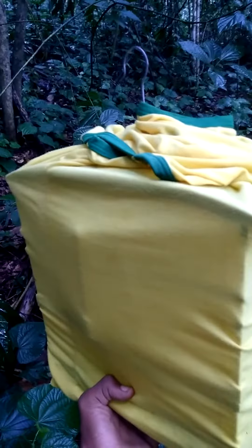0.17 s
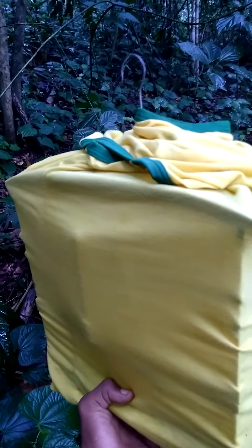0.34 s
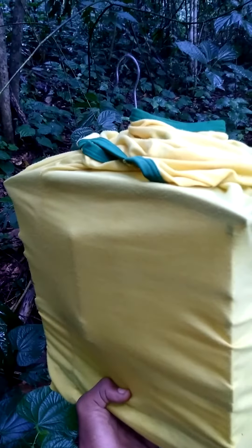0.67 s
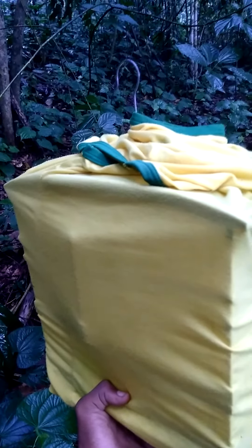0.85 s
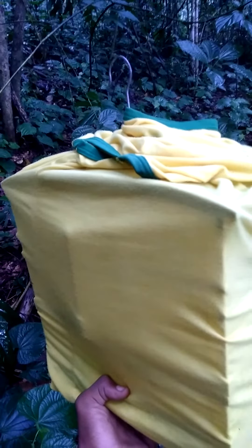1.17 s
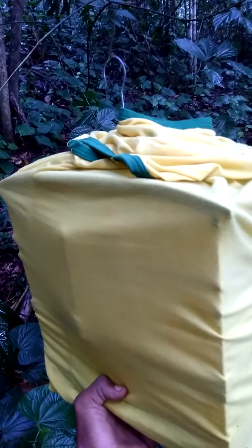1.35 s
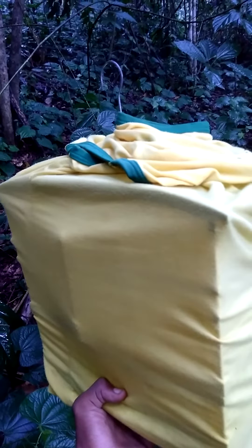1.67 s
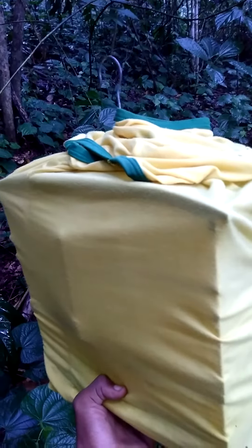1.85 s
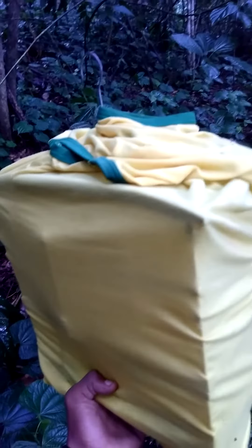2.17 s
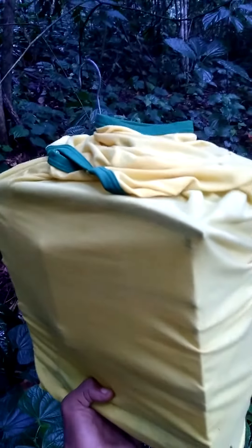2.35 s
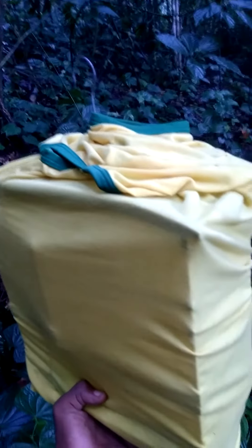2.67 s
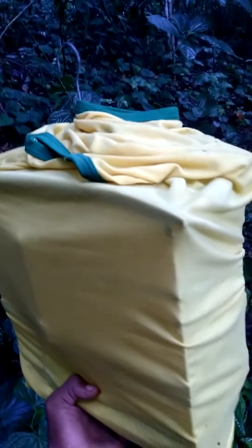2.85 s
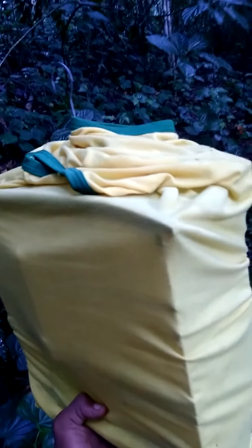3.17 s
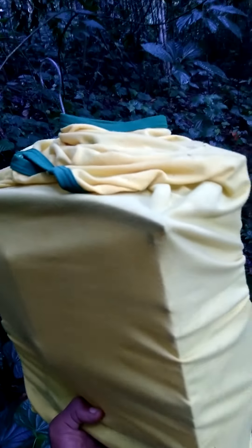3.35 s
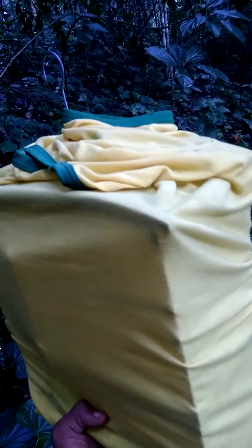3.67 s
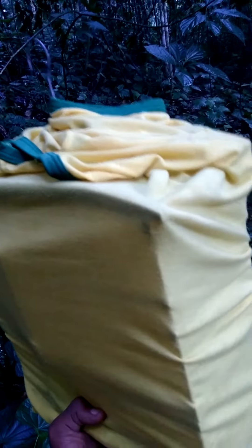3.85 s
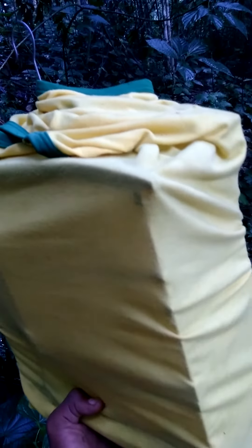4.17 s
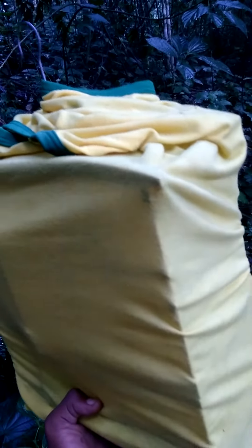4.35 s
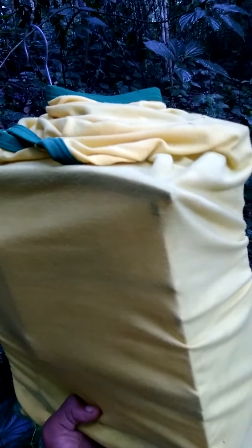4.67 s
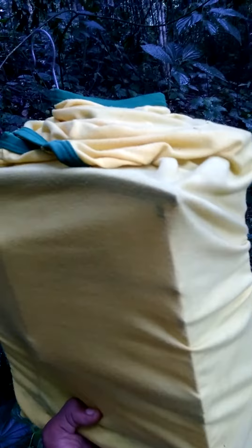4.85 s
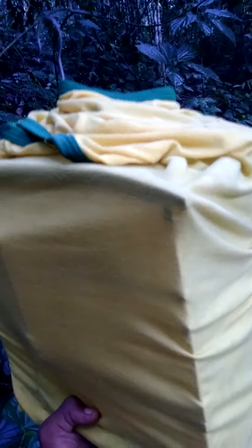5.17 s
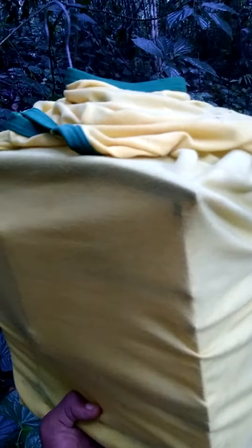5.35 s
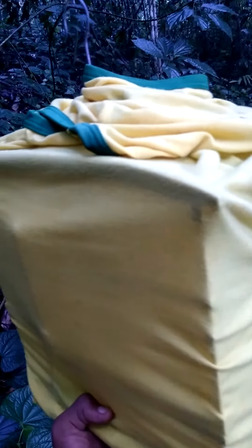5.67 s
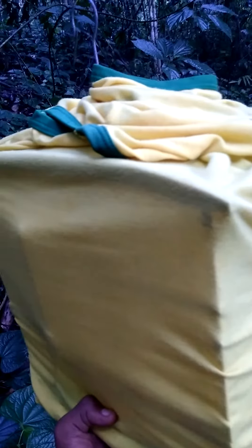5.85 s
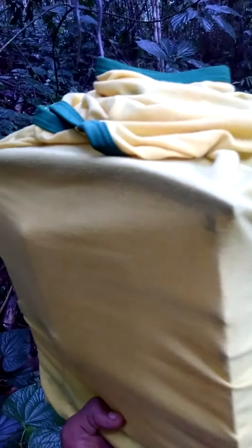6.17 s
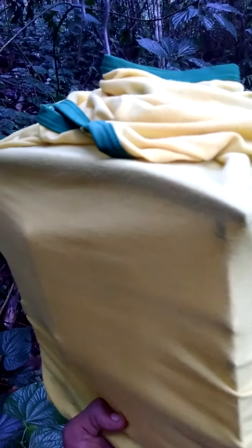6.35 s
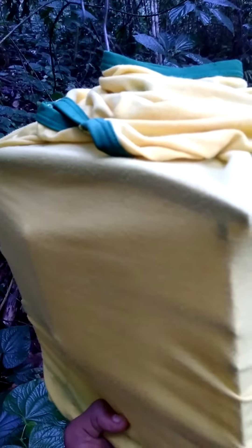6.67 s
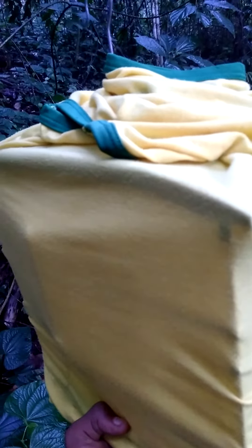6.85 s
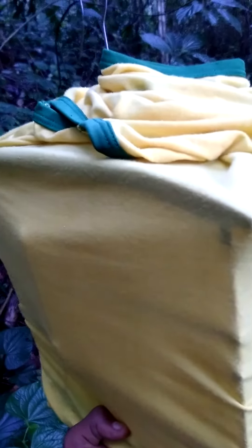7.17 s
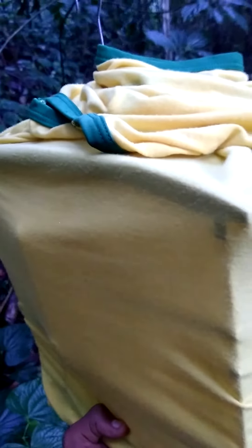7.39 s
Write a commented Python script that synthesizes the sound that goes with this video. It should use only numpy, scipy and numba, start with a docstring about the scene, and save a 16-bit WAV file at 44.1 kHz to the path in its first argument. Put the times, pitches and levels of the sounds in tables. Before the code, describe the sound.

In woodland, a small bird in a cloth-covered cage sings close to a phone: a faint high chip, then four brief, piercing falling whistles spaced well apart. Between them, cage, cloth and twigs tick, knock and rustle irregularly. Distant birds answer in echoing slurs over a low, leafy hush. The phone dips the background briefly after each loud note.

```python
"""In a wood, a small bird in a cloth-covered cage held near a phone sings sharp falling notes.
Both halves of its voice box whistle at once; pitch and level follow drawn curves.
Other birds, gliding sines steeped in echo, call from between the trunks.
Cage, cloth and twigs tick in dying noise bursts over a forest hush of shaped noise.
The phone widens its two ports by a delayed cross-feed and ducks its gain after each loud note."""
import sys
import numpy as np
from scipy import signal
from scipy.fft import rfft, irfft, next_fast_len
from scipy.io import wavfile
from scipy.ndimage import uniform_filter1d
from numba import njit

SR = 44100
rng = np.random.default_rng(int(sys.argv[2]) if len(sys.argv) > 2 else 0)


def put_to_file(sound):
    """Save the sound as 16-bit audio at rate SR, in the file named by the first command-line argument."""
    columns = np.atleast_2d(sound).T  # one column per channel
    safe = np.clip(columns, -1, 1)
    whole_steps = np.round(safe * 32767)
    wavfile.write(sys.argv[1], SR, whole_steps.astype(np.int16))


N = 331632

# how busily hand, cloth and leaves move: (time [s], level [dB])
BUSY = [(0, 2), (.6, -4.5), (1.3, 0.5), (2.1, -2), (3, -1.5), (3.7, -3), (4.8, 0), (5.5, 0), (6.2, 2),
        (6.8, -1.5), (7.1, -2.5), (7.52, -2)]


def undb(db):
    """Decibels to gain."""
    return 10 ** (np.asarray(db) / 20)


def dying_60db(t, t60_s):
    """Exponential decay by 60 dB in t60_s."""
    return np.exp(-np.log(1000) * t / t60_s)


def band(x, hz, width_hz):
    """Band-pass around hz."""
    edges = [max(hz - width_hz / 2, 20), min(hz + width_hz / 2, .45 * SR)]
    return signal.sosfilt(signal.butter(2, edges, "bandpass", fs=SR, output="sos"), x)


def walk(rate_hz, channels=1):
    """Random levels held 1 / rate_hz and smoothed twice over that time; spread near 1."""
    k = int(SR / rate_hz)
    held = np.repeat(rng.standard_normal((channels, N // k + 1)), k, axis=1)[:, :N]
    return np.sqrt(2) * uniform_filter1d(uniform_filter1d(held, k), k)


def wood(x, t60_s, build_s=0.0058, late_db=-16, stir_rad=0):
    """Trunk and leaf echoes: noise tails that build up and die; moving air blends two stereo sets."""
    t = np.arange(SR) / SR
    dying = dying_60db(t, t60_s) + undb(late_db) * dying_60db(t, 3 * t60_s)  # furthest echoes last longest
    tail = rng.standard_normal((4, SR)) * dying * (1 - np.exp(-t / build_s))
    tail = tail / np.sqrt(np.sum(tail ** 2) / 4)
    wet = signal.fftconvolve(x[None], tail, axes=1)[:, :N]
    angle = stir_rad * walk(40)
    return np.cos(angle) * wet[:2] + np.sin(angle) * wet[2:]


def hush(swell_db=.7, flicker_db=1.4, throb_hz=1400, throb_gain_db=-67, throb_depth_db=3.0):
    """Leaves, air and far insects: shaped noise, mostly unrelated at the ports; a narrow band throbs."""
    # at each port, before the BUSY level: (frequency [Hz], density [dB per Hz])
    hush_density = [(25, -103), (60, -81.5), (110, -71), (250, -78), (600, -86), (1400, -86.5),
                    (2200, -91.5), (3300, -91.5), (5000, -103), (9000, -101), (12000, -105), (15500, -108)]
    # part common to both ports: (frequency [Hz], share [0-1])
    hush_shared = [(120, 0.2), (300, 0.45), (900, 0.3), (2500, 0)]
    log_f = np.log(np.arange(N // 2 + 1) * SR / N + 1)
    hz, density_db = np.transpose(hush_density)
    shape_db = np.interp(log_f, np.log(hz), density_db)
    hz, shared = np.transpose(hush_shared)
    share = np.clip(np.interp(log_f, np.log(hz), shared), 0, 1)

    white = rfft(rng.standard_normal((3, N)))
    mixed = np.sqrt(1 - share) * white[:2] + np.sqrt(share) * white[2]
    noise = irfft(mixed * undb(shape_db), N) * np.sqrt(SR / 2)
    busy_db = np.interp(np.arange(N) / SR, *np.transpose(BUSY))
    moving = noise * undb(busy_db + swell_db * walk(3.115) + flicker_db * walk(12))
    throb = band(rng.standard_normal((2, N)), throb_hz, 130) * np.sqrt(SR / 500)
    return moving + throb * undb(throb_gain_db + throb_depth_db * walk(23))


def slurs(rows, bend_hz, flutter_db, db_per_khz=0, edge=.45):
    """Whistles gliding straight in pitch: (time [s], length [s], from [Hz], to [Hz], level [dB])."""
    dry = np.zeros(N)
    for s, length_s, hz0, hz1, db in rows:
        i = np.arange(int(max(s, 0) * SR), min(int((s + length_s) * SR), N))
        hz = np.linspace(hz0, hz1, len(i)) + bend_hz[i]
        tilt_db = db_per_khz * (hz - (hz0 + hz1) / 2) / 1000
        size = undb(db + flutter_db[i] + tilt_db) * signal.windows.tukey(len(i), edge)
        dry[i] += size * np.sqrt(2) * np.sin(2 * np.pi * np.cumsum(hz) / SR)
    return dry


def far_birds(waver_hz=90, seep_waver_hz=480, whistle_waver_hz=55, flutter_db=3.0):
    """Warbler and thin calls arrive mostly as echo, 10 dB over the direct sound; so do nearer whistlers."""
    # distant warbler, quick falling slurs: (time [s], from [Hz], level [dB])
    falls = [(0.901, 3660, -44.5), (0.96, 4004, -40), (1.116, 3824, -39), (3.397, 3490, -47.5),
             (3.643, 3496, -52), (4.431, 3550, -41), (4.489, 3710, -46), (4.599, 4126, -39.5),
             (5.607, 3530, -40), (5.81, 3890, -40), (5.984, 4380, -39), (7.257, 3580, -41.5),
             (7.455, 3880, -38)]
    # its rising slurs: (time [s], from [Hz], level [dB])
    rises = [(0.941, 2912, -42), (1.061, 3014, -42), (3.548, 2650, -40.5), (4.468, 2914, -46.5),
             (4.551, 3345, -49), (5.752, 2840, -40.5), (5.79, 3140, -44.5), (5.93, 3350, -44.5)]
    # thin high calls of another small bird: (time [s], from [Hz], level [dB])
    seeps = [(0.48, 10270, -58.5), (.68, 9770, -58), (0.863, 8450, -56.5), (1.041, 9670, -60),
             (1.448, 10400, -59.5), (1.555, 9400, -60), (2.556, 9180, -58), (4.49, 9370, -62.5)]
    # steadier whistles of other birds: (time [s], length [s], from [Hz], to [Hz], level [dB])
    whistles = [(0, 0.019, 2472, 2217, -29), (1.41, .09, 1600, 1520, -57), (1.56, 0.12, 2120, 1700, -58),
                (1.79, .1, 2120, 1700, -57), (2.345, 0.015, 3400, 3100, -58),
                (2.45, 0.038, 3350, 3050, -56), (2.53, 0.036, 3300, 3050, -61),
                (5.666, 0.1, 2910, 2640, -44.5), (6.085, 0.035, 5600, 8140, -46.5),
                (6.102, 0.02, 8650, 8000, -37.5), (6.14, .09, 2370, 1900, -51),
                (6.28, 0.1, 2060, 2180, -52), (6.51, 0.07, 3340, 3650, -55), (6.57, 0.05, 3620, 3720, -47),
                (6.62, 0.087, 3684, 3720, -53), (6.7, 0.078, 3760, 3640, -54.5),
                (6.77, 0.18, 3600, 3500, -60), (6.594, 0.074, 2450, 1950, -48),
                (6.72, 0.15, 2140, 2218, -49), (7.15, 0.15, 2560, 2200, -52), (7.415, .05, 3880, 3760, -44),
                (7.441, 0.045, 6400, 5360, -48)]
    fall_s, fall_to_hz = 0.055, 2800
    rise_s, rise_ratio = 0.069, 1.36
    seep_s, seep_to_hz = .1, 8100
    warbler_db_per_khz = -15  # the low part of each slur carries best
    far_t60_s, far_direct_db = .44, -10
    whistle_t60_s, whistle_direct_db = .36, -10

    bend, flutter = walk(300)[0], flutter_db * walk(60)[0]
    warbler_rows = [(s, fall_s, hz, fall_to_hz, db) for s, hz, db in falls]
    warbler_rows += [(s, rise_s, hz, rise_ratio * hz, db) for s, hz, db in rises]
    seep_rows = [(s, seep_s, hz, seep_to_hz, db) for s, hz, db in seeps]
    far = slurs(warbler_rows, waver_hz * bend, flutter / 2, warbler_db_per_khz)
    far = far + slurs(seep_rows, seep_waver_hz * bend, flutter)
    nearer = slurs(whistles, whistle_waver_hz * bend, flutter)

    far_echo = wood(far, far_t60_s, build_s=0.012, late_db=-19, stir_rad=1.2)
    nearer_echo = wood(nearer, whistle_t60_s, build_s=0.0023, late_db=-20, stir_rad=1.2)
    return far_echo + undb(far_direct_db) * far + nearer_echo + undb(whistle_direct_db) * nearer


def tick_shapes(count):
    """Short dying noise bursts, one for each tick, port and range, scaled to 0 dB over 2 ms."""
    # thump, knock, snap, fizz: (centre [Hz], width [Hz], t60 [s])
    tick_ranges = [(450, 460, 0.043), (1320, 900, 0.071), (2560, 2100, 0.075), (9500, 26000, 0.0037)]
    t = np.arange(2200) / SR
    noise = rng.standard_normal((count, 2, len(t)))
    noise[:, 0, 0] += 11  # the first touch is a sharp click
    noise[:, 1] = 0.22 * np.roll(noise[:, 0], shift=6, axis=-1) + 0.5 * noise[:, 1]
    shapes = np.array([band(noise * dying_60db(t, t60_s), hz, width_hz)
                       for hz, width_hz, t60_s in tick_ranges])
    return shapes * np.sqrt(.002 * SR / np.sum(shapes ** 2, axis=-1, keepdims=True))


def handling(rustle_db=(-55, -58, -68, -74), colour_db=4.0, count=750):
    """Clear ticks of cage, cloth and twigs, and a scatter of small ones from cloth and leaf litter."""
    # (time [s], level over 2 ms [dB], brightness [0 thump, 1 knock, 2 snap, 3 fizz])
    ticks = [(0.0358, -30, 0.75), (0.258, -32.5, 0.17), (0.295, -37.5, .1), (0.315, -35.5, .8),
             (0.553, -41.5, .8), (0.723, -45, .6), (0.812, -59, 1), (0.8762, -33.5, 0.035), (.95, -41, .5),
             (.966, -37.5, .3), (1.082, -41, 2.8), (1.04, -37.5, .4), (1.141, -37, 2), (1.142, -34, -0.5),
             (1.175, -34, 2.9), (1.298, -59, .8), (1.339, -52, .1), (1.37, -31.5, 1.65),
             (1.366, -26.5, 0.34), (1.477, -45, 3.1), (1.5992, -30.5, 1.3), (1.7694, -29, 0.59),
             (1.8217, -35.5, 3.5), (2.2722, -39, 0.85), (2.4349, -33, 0.63), (2.6278, -30, 0.4),
             (2.754, -40, 1.95), (3.019, -41, 3.3), (3.1091, -32, 0.5), (3.412, -34, 0.83),
             (3.969, -38, 0.88), (4.0483, -45, 3.1), (4.085, -38.5, 0.88), (4.3593, -29, 0.16),
             (4.587, -38, .9), (4.711, -38, 1), (4.799, -39, 2.9), (4.861, -36.5, 0.6), (4.881, -30, 1.2),
             (4.888, -26, .8), (4.941, -39, 0.78), (5.019, -45.5, 1), (5.2807, -32, 2.4),
             (5.3886, -34.5, 3), (5.715, -37.5, 3.1), (5.7733, -29.5, 0), (5.967, -30.5, 1.5),
             (6.2268, -33, 1.2), (6.345, -32, 0.75), (6.469, -34, 0.3), (6.509, -38, 0.8), (6.554, -36, 0),
             (6.605, -38, 0.2), (6.635, -31, 0.6), (6.684, -29.5, 0.5), (6.745, -40, 1), (6.795, -40, 0),
             (6.8403, -31.5, 0.8), (6.848, -33.5, 0.7), (6.858, -36, 0.6), (6.929, -37, 0.1),
             (7.082, -39, .9), (7.121, -39, 1), (7.462, -40, 2.1)]
    slope_db = 10  # lost per range away from the brightness
    at_s, peak_db, bright = np.transpose(ticks)[:, :, None]
    clear_db = peak_db - slope_db * np.abs(np.arange(4) - bright)

    chance = rng.random((count, 2))
    small_s = chance[:, :1] * N / SR
    size_db = np.minimum(-3.5 * np.log(chance[:, 1:]), 5.5)
    size_db = size_db + 1.2 * np.interp(small_s, *np.transpose(BUSY))
    small_db = np.array(rustle_db) + size_db + colour_db * rng.standard_normal((count, 4))

    rows = np.vstack([np.c_[at_s, clear_db], np.c_[small_s, small_db]])
    shapes = tick_shapes(len(rows))
    length = shapes.shape[-1]
    out = np.zeros((2, N + length))
    for k, (s, *db) in enumerate(rows):
        start = int(s * SR)
        out[:, start:start + length] += np.tensordot(undb(db), shapes[:, k], 1)
    return out[:, :N]


def caged_bird(flutter_db=1.24, waver_hz=30, breath_db=-20, octave_breath_db=3, square=0.093, cube=0.3):
    """Two whistling membranes, each with a weak, breathy octave; one windpipe adds combination tones."""
    # a chip, then low and high voice of four notes; a curve each: (time [s], pitch [Hz], level [dB])
    song = [
        [(1.156, 8040, -35.5), (1.1622, 9400, -24), (1.17, 8840, -43), (1.1745, 7120, -32.5),
         (1.183, 6350, -43)],
        [(1.89, 10800, -37), (1.895, 9940, -22.0), (1.905, 8820, -27.5), (1.922, 8660, -18.5),
         (1.934, 8620, -12.5), (1.953, 7800, -14.5), (1.964, 7630, -17.5), (1.97, 7900, -32),
         (1.972, 8510, -27.5), (1.976, 8370, -32.5)],
        [(1.89, 12040, -30), (1.901, 11070, -27.5), (1.905, 10450, -31), (1.921, 10650, -35),
         (1.925, 10150, -20), (1.932, 9800, -13), (1.94, 9700, -14.5), (1.967, 8790, -17.5), (1.977, 8700, -35)],
        [(3.424, 10460, -35), (3.426, 10100, -33), (3.43, 9610, -24.5), (3.443, 9040, -17.5),
         (3.453, 8840, -14.5), (3.458, 8630, -14.5), (3.472, 8230, -12.5), (3.495, 7670, -12.5),
         (3.504, 7770, -21.5), (3.511, 8360, -24.5)],
        [(3.424, 12200, -34), (3.429, 11340, -21.5), (3.437, 11020, -21.5), (3.445, 10500, -29.5),
         (3.452, 10560, -33.5), (3.465, 9820, -21), (3.473, 9480, -20.5), (3.496, 9300, -13),
         (3.506, 9240, -13.5), (3.512, 8900, -47)],
        [(5.074, 9770, -37), (5.077, 10250, -27), (5.082, 9350, -41.5), (5.085, 8920, -31), (5.088, 8570, -15),
         (5.123, 8030, -17), (5.129, 7800, -14), (5.147, 7330, -23.5), (5.154, 8190, -34)],
        [(5.079, 11530, -39), (5.085, 11470, -19.5), (5.096, 9850, -29), (5.104, 10080, -19.5),
         (5.107, 9810, -21.5), (5.119, 9700, -26.0), (5.126, 9460, -21), (5.131, 9430, -19), (5.146, 9080, -12),
         (5.157, 9000, -24.5)],
        [(6.958, 11200, -41), (6.962, 10900, -29), (6.967, 9940, -17.5), (6.974, 9170, -27), (6.979, 9150, -21),
         (6.993, 8660, -14), (7.009, 8280, -12), (7.015, 8040, -14), (7.022, 7270, -28), (7.033, 7380, -28),
         (7.042, 6870, -33)],
        [(6.96, 13000, -35), (6.963, 12240, -26), (6.976, 11780, -49.5), (6.994, 11060, -36.5),
         (7.004, 10200, -16), (7.017, 9570, -13.5), (7.027, 9140, -15), (7.034, 9680, -9), (7.046, 9400, -30)],
    ]
    # perch for chip and notes: (left minus right port [dB], left port's phase lead [microseconds])
    perch = [(2, 406.5), (5, 324.5), (-2, 396), (1, 404.3), (1, 425)]
    attack_s, release_s = .001, .004
    octave_db, octave_at_hz, octave_db_per_khz = -10.5, 7380, -14  # strongest on the lowest notes
    echo_t60_s, echo_db = 0.29, -21

    out = np.zeros((2, N), complex)
    flutter, waver = walk(400)[0], walk(500)[0]
    breath = band(band(rng.standard_normal((2, N)), 1600, 2800), 1600, 2800)
    for k, rows in enumerate(song):
        s, hz, db = np.transpose(rows)
        pan_db, lead_us = perch[(k + 1) // 2]
        i = np.arange(int((s[0] - attack_s) * SR), int((s[-1] + release_s / 2) * SR))
        t = i / SR
        pitch_hz = np.interp(t, s, hz)
        phase = 2 * np.pi * np.cumsum(pitch_hz + waver_hz * waver[i]) / SR
        note_octave_db = octave_db + octave_db_per_khz * (pitch_hz - octave_at_hz) / 1000
        octave_gain = undb(np.clip(note_octave_db, -30, -6))
        fade = np.clip(np.minimum((t - t[0]) / attack_s, (t[-1] - t) / release_s), 0, 1)
        for port, side in enumerate((1, -1)):
            air = breath[port, i]
            tone = np.exp(1j * np.interp(t - port * lead_us * 1e-6, t, phase))
            octave = octave_gain * tone ** 2 * (1 + undb(octave_breath_db) * air)
            breathy = undb(breath_db) * air * tone  # air noise clings to the tone
            size = undb(np.interp(t, s, db + side * pan_db / 2) + flutter_db * flutter[i]) * fade
            out[port, i] += size * (np.sqrt(2) * (tone + octave) + breathy)

    power = np.abs(out) ** 2
    beating = power - uniform_filter1d(power, size=88)
    out = np.real(out + square * out ** 2 + cube * out * beating)
    out = band(out, 11000, 15000)
    return out + undb(echo_db) * wood(out[0], echo_t60_s)


def scene():
    """What reaches the two ports."""
    return hush() + far_birds() + handling() + caged_bird()


def widen(ports):
    """Each channel takes off a late, dulled copy of the other port; the left is then trimmed."""
    cross_share, cross_delay_us, cross_fade_hz, left_db = .7, 397, 11000, -1.6
    size = next_fast_len(N + 64)
    f = np.arange(size // 2 + 1) * SR / size
    late = np.exp(-2j * np.pi * f * cross_delay_us * 1e-6)
    dulled = late / np.hypot(1, (f / cross_fade_hz) ** 2)
    crossed = irfft(rfft(ports[::-1], size) * dulled, size)[:, :N]
    return (ports - cross_share * crossed) * undb([[left_db], [0]])


@njit
def duck(power, above_db, speed, recover_db_s, gain_db):
    """Gain [dB]: falls while the output is over the mark, the faster the louder; else creeps back up."""
    out, level = np.empty(len(power)), 1e-9
    for i in range(len(power)):
        level += (power[i] * 10 ** (gain_db / 10) - level) / 220  # smoothed over 220 samples
        over_db = 10 * np.log10(level) - above_db
        if over_db > 0:
            gain_db = gain_db - speed * over_db / SR
        else:
            gain_db = min(0., gain_db + recover_db_s / SR)
        out[i] = gain_db
    return out


def record(dry):
    """Phone: widening, ducking of all but its own hiss, a faint mirror of the treble, a cut at the top."""
    duck_above_db, duck_speed = -34.5, 15.06  # speed [dB/s per dB over]
    recover_db_s, start_db = 8.0, -2.5
    self_hiss_db, late_hiss_db = -73.5, -74  # before widening; before its band-pass
    mirror_hz, mirror_db, top_hz = 8000, -28.5, 15800

    wide = widen(dry)
    power = np.mean(wide ** 2, axis=0)
    gain_db = duck(power, duck_above_db, duck_speed, recover_db_s, start_db)
    self_hiss = widen(undb(self_hiss_db) * rng.standard_normal((2, N)))
    late_hiss = undb(late_hiss_db) * band(rng.standard_normal((2, N)), 9500, 6000)
    wide = wide * undb(gain_db) + self_hiss + late_hiss

    # a band splitter leaks treble folded about mirror_hz
    carrier = 2 * np.cos(2 * np.pi * 2 * mirror_hz * np.arange(N) / SR)
    folded = band(wide, 9600, 1700) * carrier
    wide = wide + undb(mirror_db) * band(folded, 6500, 2500)
    return signal.sosfilt(signal.ellip(10, .2, 80, top_hz, fs=SR, output="sos"), wide)


dry = scene()
out = record(dry)
put_to_file(out)
```